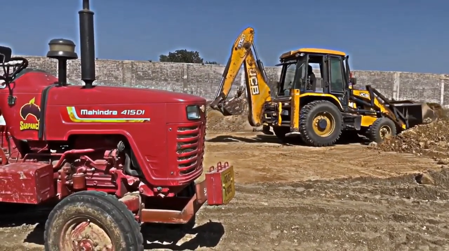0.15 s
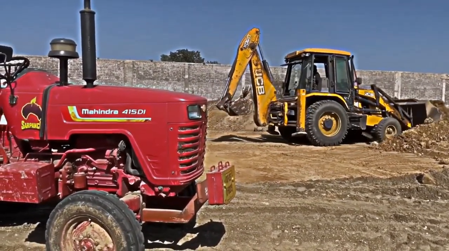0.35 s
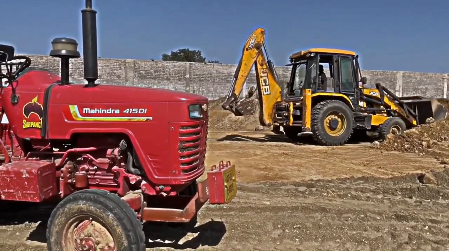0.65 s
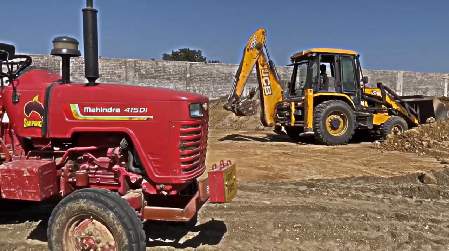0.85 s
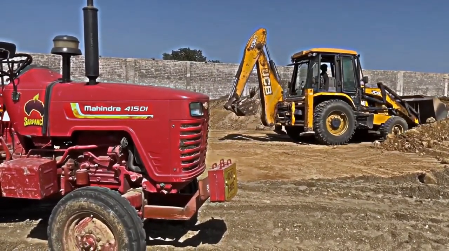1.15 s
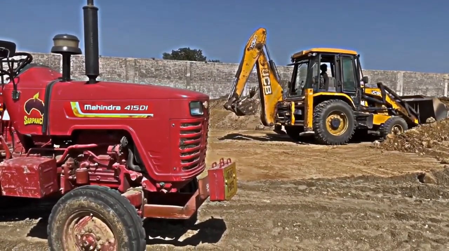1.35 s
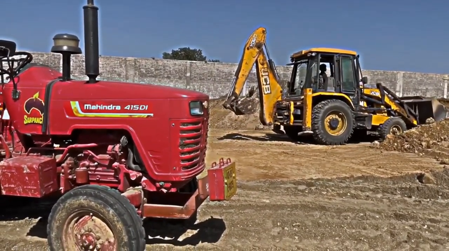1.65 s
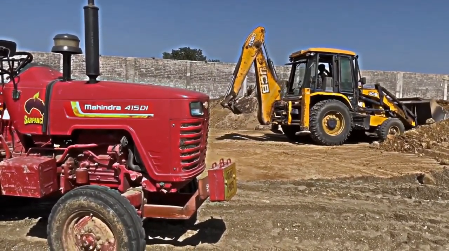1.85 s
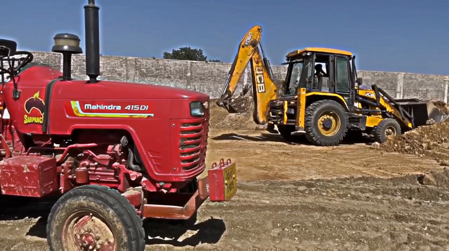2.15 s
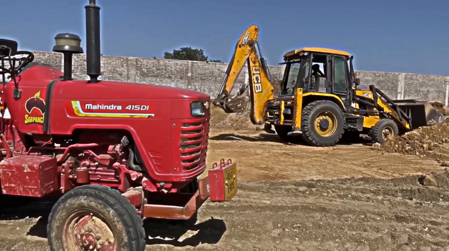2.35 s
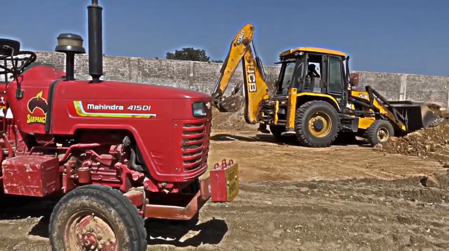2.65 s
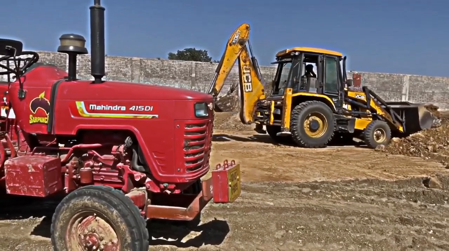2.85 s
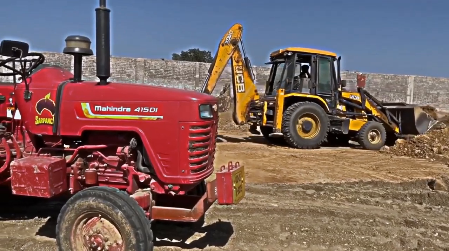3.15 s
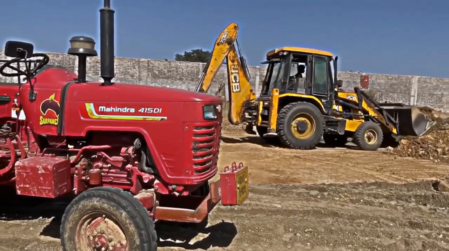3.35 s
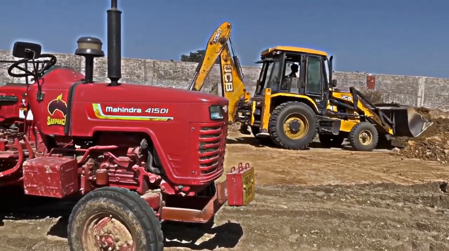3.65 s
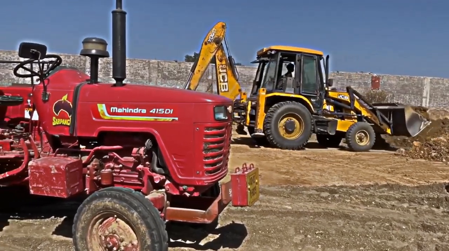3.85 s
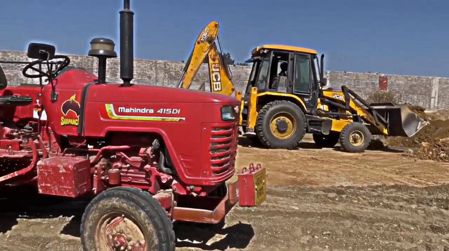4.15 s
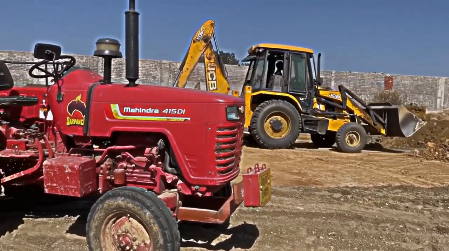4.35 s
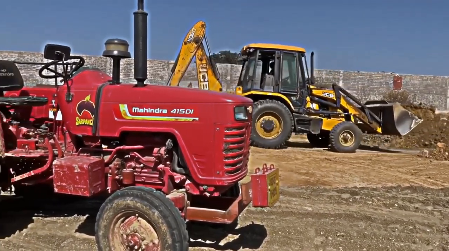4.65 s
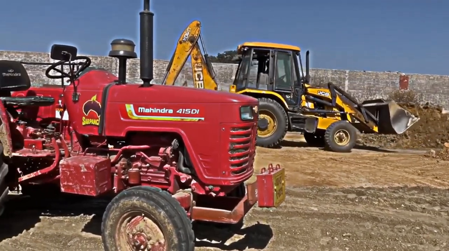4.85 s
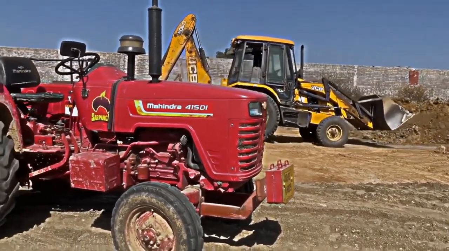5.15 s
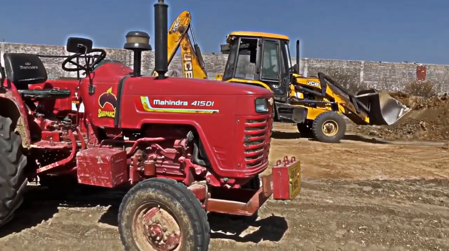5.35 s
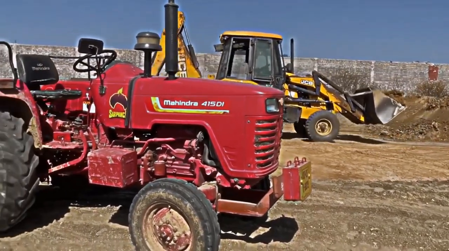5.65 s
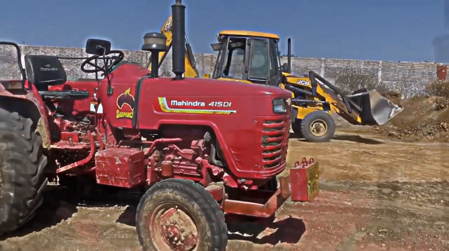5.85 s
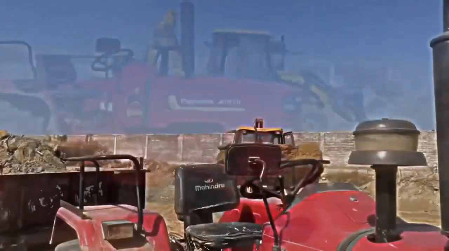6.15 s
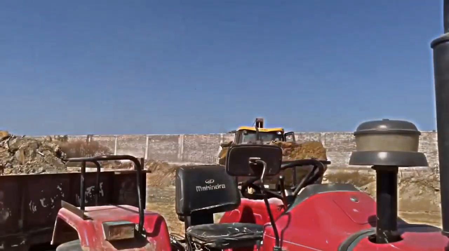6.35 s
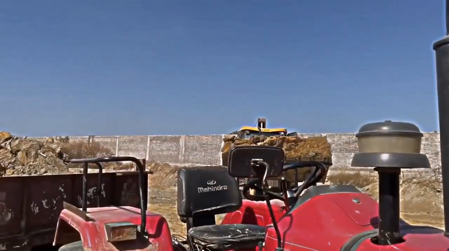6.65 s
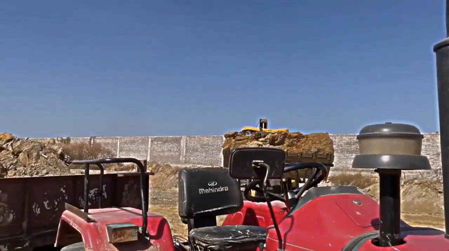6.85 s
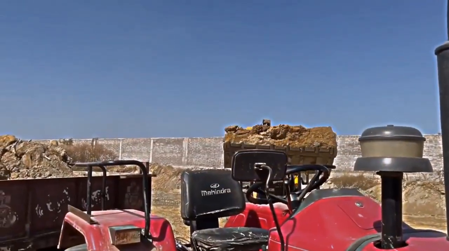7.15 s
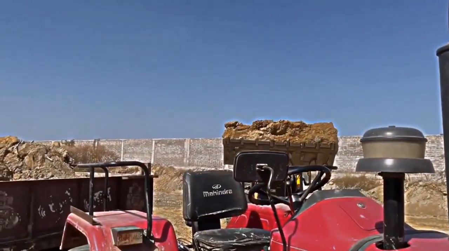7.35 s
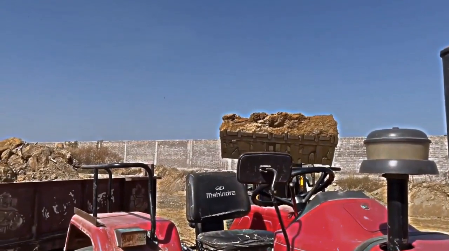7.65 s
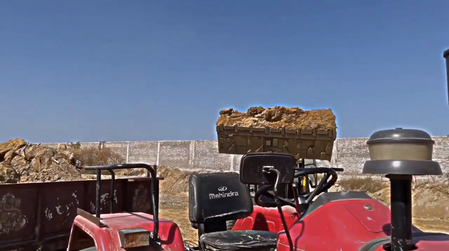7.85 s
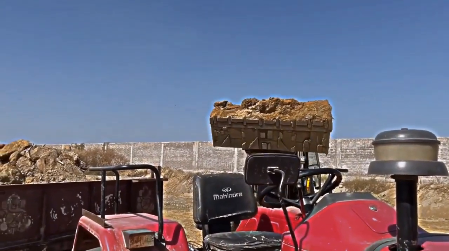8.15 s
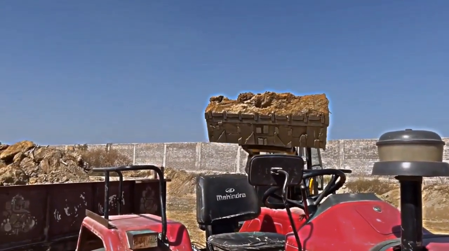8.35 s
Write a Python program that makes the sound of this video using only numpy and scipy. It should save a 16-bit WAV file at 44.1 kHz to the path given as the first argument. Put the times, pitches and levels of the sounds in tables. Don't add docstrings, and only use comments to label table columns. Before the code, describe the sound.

A loader's diesel rumbles across an open earth site with pump whine and bucket thumps, then dissolves to a loud, close engine throbbing at higher revs.

```python
import sys
import numpy as np
from scipy import signal
from scipy.fft import rfft, irfft, next_fast_len
from scipy.io import wavfile
from scipy.ndimage import uniform_filter1d

SR = 44100
rng = np.random.default_rng(int(sys.argv[2]) if len(sys.argv) > 2 else 0)


def unload_wav(signal):
    wavfile.write(
        sys.argv[1],
        SR,
        np.round(np.clip(np.atleast_2d(signal).T, -1, 1) * 32767).astype(np.int16),
    )


def invert_db(level):
    return 10 ** (np.asarray(level, dtype=float) / 20)


N = 375291
SIZE = next_fast_len(N + 8192)
HZ = np.fft.rfftfreq(SIZE, 1 / SR)
T = np.arange(N) / SR
LIGHT_TURNS_PER_S = 21.4


def evened(x):
    return x / np.sqrt(np.mean(x ** 2) + 1e-20)


def read(points, hz):
    f, value = np.transpose(points)
    return np.interp(np.log(hz + 1), np.log(f + 1), value)


def play(rows):
    s, *columns = np.transpose(rows)
    return [uniform_filter1d(np.interp(T, s, c), size=3500) for c in columns]


def step(s, rise_s):
    return np.clip((T - s) / rise_s, 0, 1)


def span_of(s, length):
    return slice(max(round(s * SR), 0), round((s + length) * SR))


def swells(rows):
    out = np.zeros(N)
    for s, length, db in rows:
        span = span_of(s, length)
        out[span] += db * np.sin(np.pi * (T[span] - s) / length) ** 2
    return out


def above(hz):
    return 1 / (1 + (hz / (HZ + 1)) ** 6)


def modes(table):
    return sum(invert_db(db) / (1 + 2j * (HZ - hz) / width) for hz, width, db in table)


def crank_noise(turns, repeat, knock, uneven):
    fresh = rng.standard_normal((int(turns[-1]) + 21, 2048))
    kept = signal.lfilter([1], [1, -np.clip(repeat, 0, .95)], fresh, axis=0)[20:]
    x = kept[turns.astype(int), (turns % 1 * 2048).astype(int)]
    firing = np.cos(4 * np.pi * turns) - .25 * np.sin(8 * np.pi * turns)
    swell = knock * firing + uneven * np.cos(2 * np.pi * turns)
    return rfft(evened(x * np.exp(swell)), SIZE)


def at_ports(turns, same, lead, *grain):
    # (frequency [Hz], left minus right [dB])
    lean = [(60, -1.5), (130, 2), (290, 1), (620, -1.5), (1360, -3), (2950, 1), (6440, 0), (14000, 0)]
    likeness = np.clip(read(same, HZ), 0, 1)
    left = crank_noise(turns, *grain)
    shared = likeness * left * np.exp(-1j * read(lead, HZ))
    right = shared + np.sqrt(1 - likeness ** 2) * crank_noise(turns, *grain)
    return np.array([left, right]) * invert_db(np.outer([.5, -.5], read(lean, HZ)))


def layer(z, gain, level_db, lo_hz, hi_hz):
    z = z * gain
    inside = abs(z.mean(0)[(HZ > lo_hz) & (HZ < hi_hz)]) ** 2
    return irfft(z, SIZE)[:, :N] * invert_db(level_db) / np.sqrt(2 * inside.sum() / SIZE / N)


def shifting_air(x, patchy_db, start_hz):
    hz, t, z = signal.stft(x, SR, nperseg=2048)
    field = rng.standard_normal(z.shape[1:])
    field = evened(uniform_filter1d(uniform_filter1d(field, size=5, axis=0), size=5, axis=1))
    upper = np.clip(hz / start_hz - 1, 0, 1)[:, None]
    return signal.istft(z * invert_db(patchy_db * field * upper), SR, nperseg=2048)[1][:, :N]


def songs(z, table):
    x, out = irfft(z, SIZE), np.zeros((2, SIZE))
    for s, length, hz, width, db in table:
        start = round(s * SR)
        n = round(length * 100) * SR // 100
        span = slice(start, start + n)
        ring = 1 / (1 + .95j * (np.fft.rfftfreq(n, 1 / SR) - hz) / width) ** 2
        sung = evened(irfft(rfft(x[:, span]) * ring, n))
        out[:, span] += invert_db(db - 1.0) * sung * signal.windows.tukey(n, .5)
    return out[:, :N]


def engine(turns, levels_db, colour, hull, singing, same, lead, low, high):
    rumble_db, boom_db, growl_db, clatter_db = levels_db
    body = at_ports(turns, same, lead, *low)
    knock = at_ports(turns, same, lead, *high)
    tone = invert_db(read(colour, HZ)) * (1 + modes(hull))
    a, b, c = above(186.0), above(307), above(1140)
    out = layer(body, tone * np.sqrt(1 - a), rumble_db, 35, 150)
    out += layer(body, tone * np.sqrt(a * (1 - b)), boom_db, 160, 300)
    out += layer(knock, tone * np.sqrt(b * (1 - c)), growl_db, 320, 1200)
    out += layer(knock, tone * np.sqrt(c), clatter_db, 2400, 7000)
    ring_up = evened(np.exp(.3 * np.cos(4 * np.pi * turns)))
    return shifting_air(out, patchy_db=2.16, start_hz=540) + songs(knock, singing) * ring_up


def throb(turns, orders):
    angle = np.linspace(0, 1, 2049)
    shape = 0
    for k, db in orders:
        phase = -.2 + .0875 * k ** 2 + np.pi * (6 < k < 16)
        shape = shape + invert_db(db) * np.cos(2 * np.pi * k * angle + phase)
    return np.interp(turns % 1, angle, evened(shape))


def strands(turns):
    # (time [s], length [s], frequency [Hz], level [dB])
    brief = [(-0.06, 0.28, 67.0, -21.5), (-0.05, 0.4, 85.0, -20.5), (-0.03, 0.13, 108.0, -25),
             (0.17, 0.31, 107.0, -21), (0.27, 0.21, 214.0, -26.5), (0.33, 0.2, 85.0, -27),
             (0.44, 0.39, 66.0, -20), (0.6, 0.16, 85.0, -19.5), (0.84, 0.43, 84.0, -30.5),
             (0.9, 0.57, 149.0, -32.5), (1.03, 0.34, 170.0, -33), (1.182, 0.18, 216.0, -38.0),
             (1.19, 0.12, 258.0, -40), (1.21, 0.28, 108.0, -36), (1.42, 0.19, 63.0, -28.5),
             (1.5, 0.2, 152.0, -38), (1.547, 0.2, 173.0, -35.0), (1.59, 0.24, 64.0, -30),
             (1.64, 0.24, 86.0, -36), (1.85, 0.37, 64.0, -28), (1.87, 0.23, 174.0, -31),
             (1.883, 0.21, 150.0, -40), (1.88, 0.2, 217.0, -30), (1.91, 0.19, 106.0, -29),
             (1.98, 0.27, 85.0, -27), (2.12, 0.49, 63.0, -26), (2.183, 0.42, 151.0, -35),
             (2.29, 0.3, 172.0, -36), (2.46, 0.21, 108.0, -31), (2.52, 0.47, 85.0, -30),
             (2.64, 0.21, 107.0, -26), (2.66, 0.16, 150.0, -33), (2.98, 0.38, 62.0, -31),
             (3.103, 0.47, 128.0, -29.5), (3.29, 0.25, 172.0, -32), (3.437, 0.33, 106.0, -28),
             (3.82, 0.68, 85.0, -23.0), (3.96, 0.2, 151.0, -27), (4.21, 0.42, 173.0, -31),
             (4.583, 0.25, 85.0, -23.5), (4.72, 0.46, 109.0, -23.5), (4.773, 0.31, 87.0, -21.0),
             (4.908, 0.35, 129.0, -19.5), (4.982, 0.38, 87.0, -18.5), (4.978, 0.52, 108.0, -19.5),
             (5.35, 0.38, 84.0, -13), (5.468, 0.21, 172.0, -24.0), (5.92, 0.16, 65.0, -17),
             (5.92, 0.16, 110.0, -14), (6.063, 0.1, 82.0, -20)]
    # (time [s], length [s], frequency [Hz], level [dB])
    low_orders = [(0, .36, 43, -27), (.55, .22, 43, -28), (2.3, .7, 43, -33), (3.05, .28, 43, -30),
                  (3.4, .5, 43, -29), (4.0, .22, 43, -29), (4.3, .6, 43, -31), (5.15, .3, 43, -22),
                  (5.48, .22, 43, -24), (3.7, .45, 64, -28), (4.15, .22, 64, -29), (5.05, .9, 64, -23),
                  (3.25, .6, 86, -30), (5.42, .5, 107, -21), (.55, .22, 107, -25), (3.5, .7, 129, -30),
                  (4.55, .5, 129, -23), (5.2, .22, 129, -21), (5.46, .32, 129, -23), (.1, .45, 129, -28)]
    rows = brief + low_orders
    out = np.zeros(N)
    for (s, length, hz, db), path in zip(rows, rng.random(len(rows))):
        span = span_of(s, length)
        order = round(hz / LIGHT_TURNS_PER_S)
        tone = np.cos(2 * np.pi * (order * turns[span] + path))
        swell = np.sin(np.pi * (T[span] - s) / length) ** 2
        out[span] += np.sqrt(2) * invert_db(db - 1) * swell * tone
    return out


def far_loader():
    # (time [s], level [dB])
    far_load = [(0, -18), (.3, -18.5), (.47, -22.5), (.66, -17), (.9, -30), (1.2, -31.5), (1.5, -29),
                (1.87, -33.5), (1.99, -26.5), (3.1, -28.5), (3.88, -26), (4.05, -21), (4.58, -28),
                (4.72, -22), (5.2, -16), (5.58, -14), (5.84, -17.5), (6.2, -17)]
    # (time [s], length [s], gain [dB])
    heaves = [(-.2, 0.33, 11), (.25, 0.51, 3.5), (.55, 0.48, 4), (1.1, 0.36, 0.5), (1.88, 0.46, 4),
              (2.2, 0.31, 6.5), (2.62, 0.26, 4), (3.3, 0.16, 1.5), (3.92, 0.18, 5.5), (4.7, 0.56, -2.5),
              (5.4, 0.31, 2.5)]
    # (time [s], length [s], gain [dB])
    scrapes = [
        (.3, 0.39, 2.5),
        (.65, 0.27, 3),
        (1.88, 0.14, 2.5),
        (2.08, 0.31, 6),
        (2.53, 0.21, 5),
        (4.55, 0.59, 0.5),
        (5.05, 1, 0.5),
        (5.45, .35, 1),
    ]
    # (frequency [Hz], level [dB per Hz])
    far_colour = [(28, -16), (45, 2.5), (93, 0.5), (215, -16), (436, -21.5), (955, -26), (1610, -35.5),
                  (2210, -36.5), (3300, -40.5), (4500, -41.5), (5600, -48), (8500, -49.5), (12000, -55.5),
                  (15500, -56)]
    # (frequency [Hz], width [Hz], level over the rest [dB])
    far_body = [(532, 37, -4.5), (940, 16, -7), (2140, 770, -12), (4350, 150, -7.5), (4920, 62, -6)]
    # (time [s], length [s], frequency [Hz], width [Hz], level [dB])
    far_songs = [(3.9, 1.7, 2170, 40, -55), (1.1, .6, 3625, 40, -62), (.45, 1.1, 4450, 35, -61),
                 (.3, 2.1, 1290, 50, -47), (1.8, .35, 1845, 30, -53), (.3, .5, 870, 30, -46),
                 (1.8, .7, 845, 40, -44), (.68, .27, 525, 25, -43), (1.8, 4.0, 530, 26, -39),
                 (2.9, .4, 650, 30, -42), (3.8, .5, 965, 25, -43), (4.7, .36, 352, 25, -34),
                 (3.4, .8, 370, 25, -40), (5.7, .55, 548, 20, -34), (0, .15, 570, 40, -38),
                 (.7, .3, 960, 30, -46), (1.8, .6, 960, 30, -44), (5.25, .45, 345, 30, -36),
                 (5.3, .6, 940, 50, -44), (1.61, .11, 2280, 200, -47), (1.1, .4, 530, 25, -44),
                 (4.85, 1.1, 2180, 120, -47),
        (4.9, .45, 1900, 90, -49),
        (5.0, .7, 4300, 150, -54),
        (5.3, .6, 2950, 80, -53),
        (5.1, .6, 5100, 120, -58),
        (5.0, .7, 3650, 100, -56),
        (0, .14, 280, 40, -30),
        (.52, .14, 535, 30, -39),
    ]
    # (frequency [Hz], left-right likeness [0-1])
    far_same = [(60, 1), (350, 1), (860, 1), (1400, 1), (1900, 0.81), (2900, 0.58), (4200, 0.97),
                (5500, 0.083), (7000, 0.7), (14000, .4)]
    # (frequency [Hz], left lead [rad])
    far_lead = [(0, 0), (1290, -0.7), (1550, -1.5), (1980, -0.2), (2670, -0.8), (5000, 0.3), (6030, -2.7),
                (6550, -1.4), (7670, -3.1), (9560, -3.3), (10600, -6.0), (11000, -6.2), (13000, -6.3),
                (14200, -9.4)]
    # (multiple of the crank turn, level [dB])
    far_exhaust = [(1, -27), (2, 0), (3, 0.5), (4, -1), (5, -12), (6, 2), (7, -27), (8, -12.5)]

    light_db = -28
    load = play(far_load)[0] - light_db
    heave = swells(heaves)
    turns = np.cumsum(LIGHT_TURNS_PER_S + .02 * load) / SR
    nearing = step(0, 4.4)
    pull = 2 * step(1.87, 0.055)
    hidden = -2 * step(5.7, 0.093)
    growl = -40 + 4.5 * nearing + pull + hidden + 0.31 * heave
    clatter = -50.5 + 5.5 * nearing + hidden + swells(scrapes)
    levels_db = light_db + load - 4.5, -36 + 0.2 * load + heave, growl, clatter
    low, high = (.68, .08, .08), (.42, 0.036 + 0.14 * nearing, .07)
    high = (.42, 0.036 + 0.14 * nearing, .07)
    rough = engine(turns, levels_db, far_colour, far_body, far_songs, far_same, far_lead,
                   low, high)
    note_db = -49.5 + 0.84 * load + 2 * T
    return rough + strands(turns) + invert_db(note_db) * throb(turns, far_exhaust)


def pump():
    # (time [s], length [s], frequency [Hz], level [dB])
    whines = [(.27, 1.3, 2163, -48), (.26, .2, 2155, -47), (.43, .17, 2160, -45), (.72, .3, 2170, -43),
              (1.0, .18, 2165, -45), (1.16, .16, 2150, -43), (1.29, .13, 2170, -42), (1.39, .2, 2160, -46),
              (1.62, .46, 2165, -46), (2.24, .2, 2160, -45), (2.56, .2, 2165, -47), (2.75, .9, 2160, -57),
              (6.1, .1, 2165, -46), (6.21, .1, 2150, -41), (6.29, .22, 2155, -39), (6.49, .16, 2140, -46),
              (.45, .5, 3620, -53), (1.82, .26, 3320, -55), (2.1, .14, 3340, -50), (2.28, .14, 3330, -49),
              (2.1, .36, 1850, -46), (2.56, .2, 1850, -49), (6.08, .24, 3290, -53), (.42, .16, 1295, -43),
              (.7, .7, 1295, -50), (.31, .16, 870, -43)]
    wander = rng.standard_normal((2, N))
    wander = evened(uniform_filter1d(uniform_filter1d(wander, size=700), size=700))
    drift = 2 * np.pi * np.cumsum(10.27 * wander[0]) / SR
    throbbing = np.exp(.31 * np.cos(4 * np.pi * LIGHT_TURNS_PER_S * T) + .28 * wander[1])
    tones = np.zeros(N)
    for s, length, hz, db in whines:
        span = span_of(s, length)
        t = T[span]
        fade = np.clip(np.minimum(t - s, s + length - t) / 0.041, 0, 1)
        tones[span] += invert_db(db - 1) * fade * np.sin(2 * np.pi * hz * t + drift[span])
    return np.sqrt(2) * tones * evened(throbbing)


def knocks():
    # (time [s], peak level [dB], frequency [Hz])
    hood_rings = [(0.737, -36, 510), (1.076, -23, 826), (2.354, -21, 726), (2.475, -22, 550),
                  (2.561, -22, 554), (2.751, -23, 530), (2.8, -22, 536), (2.871, -21, 490),
                  (3.184, -25, 536), (3.231, -25, 525), (3.466, -19, 522), (3.513, -30, 545),
                  (3.609, -18, 500), (4.171, -23, 538), (4.217, -20, 533), (4.268, -21, 517),
                  (4.315, -16, 536), (4.591, -21, 716), (5.103, -23, 514), (5.148, -24, 576),
                  (5.195, -23, 520), (5.242, -22, 864), (5.312, -22, 544), (5.333, -23, 530),
                  (5.381, -16, 560), (5.43, -18, 580), (5.478, -16, 520), (5.524, -13, 520),
                  (5.712, -16, 517), (5.753, -21, 930)]
    # (time [s], peak level [dB], frequency [Hz], t60 [s])
    thumps = [
        (1.194, -18, 196, 0.035),
        (1.237, -14.5, 254, 0.03),
        (1.939, -14, 210, 0.038),
        (1.968, -8, 157, 0.018),
        (2.127, -20, 156, 0.024),
        (.865, -19, 250, .04),
        (.915, -18.5, 262, 0.05),
        (6.826, -17, 205, .05),
    ]
    # (time [s], peak level [dB], frequency [Hz])
    pipe_rings = [(6.752, -20, 340), (6.774, -23, 362), (6.833, -27, 342), (6.851, -24, 388),
                  (6.897, -14, 550), (6.917, -22, 390), (6.963, -15, 404), (7.035, -17, 547),
                  (7.102, -19, 550), (7.147, -25, 393), (7.263, -20, 396), (7.311, -14, 490),
                  (7.331, -19, 398), (7.359, -19, 570), (7.393, -16, 390), (7.423, -14.5, 385),
                  (7.498, -15, 542), (7.541, -19, 563), (7.588, -12, 540), (7.652, -9.5, 554),
                  (7.679, -18, 366), (7.72, -20, 347), (7.754, -20, 412), (7.791, -14, 547),
                  (7.883, -14, 492), (7.94, -12, 383), (7.977, -19, 560), (8.045, -19, 390),
                  (8.118, -17, 406), (8.157, -16, 396), (8.182, -8, 432), (8.228, -7.5, 414),
                  (8.249, -7.5, 506), (8.275, -11, 400), (8.317, -14, 382), (8.341, -12.5, 482),
                  (8.386, -16, 395), (8.411, -15, 342), (8.434, -22, 402), (8.489, -20, 389)]
    # (time [s], peak level [dB], frequency [Hz])
    bracket_rings = [(6.8, -27, 915), (6.827, -21.5, 963), (6.938, -26, 960), (6.984, -25, 1050),
                     (7.033, -18.5, 1000), (7.337, -31, 950), (7.418, -25, 953), (7.678, -22, 966),
                     (7.866, -29, 958), (7.957, -25, 970), (7.998, -32, 900), (8.047, -26, 977),
                     (8.072, -20.5, 970), (8.135, -21, 960), (8.181, -18.5, 975), (8.232, -25, 955),
                     (8.273, -23.5, 945), (8.333, -28, 900), (8.366, -21, 990), (8.411, -18, 990)]
    # (time [s], peak level [dB], frequency [Hz], t60 [s])
    ticks = [
        (7.8497, -17.5, 3600, 0.005),
        (7.8498, -20, 4130, 0.0038),
        (7.85, -24, 4750, .004),
        (7.8962, -17, 3650, 0.0059),
        (7.8963, -21, 4200, 0.0036),
        (7.8965, -24, 4750, .004),
    ]
    blows = ticks + thumps
    for rows, t60 in [(pipe_rings, 0.066), (bracket_rings, 0.15), (hood_rings, 0.064)]:
        blows = blows + [(s, db - 4, hz, t60) for s, db, hz in rows]
    out, t = np.zeros(N + 4000), np.arange(4000) / SR
    rise = np.minimum(t / .0006, 1)
    for s, db, hz, t60 in blows:
        out[round(s * SR):][:4000] += invert_db(db - 60 * t / t60) * rise * np.sin(2 * np.pi * hz * t)
    return out[:N]


def near_engine():
    # (time [s], speed [firings/s])
    near_speed = [(6.05, 39.31), (6.24, 39.34), (6.4, 40.04), (6.52, 41.51), (6.74, 41.21), (6.97, 42.98),
                  (7.22, 43.44), (7.85, 43.69), (8.25, 43.71), (8.51, 42.71)]
    # (time [s], level [dB])
    near_level = [(6.05, -17.5), (6.36, -14), (6.52, -8), (6.72, -8.5), (6.95, -6.5), (8.51, -8)]
    # (time [s], length [s], gain [dB])
    rattles = [
        (6.2, 0.61, 2),
        (6.95, 0.23, -1),
        (7.75, 0.52, 2.5),
        (8.15, 0.48, 3),
    ]
    # (frequency [Hz], level [dB per Hz])
    near_colour = [(28, -26), (60, 8.5), (120, -1.5), (200, -19), (300, -28), (460, -14), (680, -20),
                   (970, -20.5), (1600, -29), (2300, -28.5), (5000, -41.5), (8200, -50), (11000, -49.5),
                   (15500, -59)]
    # (frequency [Hz], width [Hz], level over the rest [dB])
    near_body = [(366, 21, 1), (556, 27, 1.5), (960, 26, -0.5), (1860, 63, -8), (2500, 180, -18)]
    # (time [s], length [s], frequency [Hz], width [Hz], level [dB])
    near_songs = [(6.0, .55, 555, 20, -35), (6.1, .55, 955, 28, -41), (6.4, .45, 362, 40, -41),
                  (6.25, .3, 2150, 90, -45), (7.0, .45, 980, 40, -41), (6.4, 1.9, 790, 50, -43),
                  (7.2, 1.1, 552, 45, -32), (7.15, 1.2, 490, 70, -34.5), (7.05, 1.45, 395, 40, -38),
                  (7.9, .6, 400, 50, -36), (7.9, .6, 975, 50, -42), (8.0, .4, 1130, 40, -43),
                  (8.1, .4, 1520, 80, -46), (6.3, .22, 2310, 60, -49)]
    # (frequency [Hz], left-right likeness [0-1])
    near_same = [(60, 0.98), (350, 0.93), (860, 0.92), (1400, 0.14), (1900, 0.52), (3400, 0.96),
                 (4700, 0.12), (7000, 0.28), (14000, .3)]
    # (frequency [Hz], left lead [rad])
    near_lead = [(0, 0), (1120, -0.2), (1380, -1.5), (1810, -0.2), (3450, 1.5), (5940, -0.6), (7060, -1.6),
                 (7670, -3.1), (8960, -3.2), (11000, -6.3), (13400, -6.3), (13700, -6.7), (14000, -9.6),
                 (14200, -9.2)]
    # (multiple of the crank turn, level [dB])
    exhaust_orders = [(1, -18.5), (2, -1.5), (3, -27), (4, 3), (5, -14), (6, -4), (7, -37.5), (8, -20.5),
                      (9, -36), (10, -23.5), (11, -34.5), (12, -29), (13, -46.5), (14, -41), (15, -37)]
    # (multiple of the crank turn, level [dB])
    pipe_orders = [(16, -11), (17, -13.5), (18, 2), (19, -12), (20, -10), (21, -19.5), (22, -5.5),
                   (23, -12.5), (24, -3.5), (25, -3.5), (26, -7.5)]
    # (time [s], level re exhaust [dB])
    pipe_fill = [(6.05, -24.5), (6.75, -28), (7.1, -25), (7.45, -22.5), (7.95, -26), (8.25, -21.5),
                 (8.51, -25)]

    firings, exhaust = play(near_speed)[0], play(near_level)[0]
    rattle = swells(rattles)
    turns = np.cumsum(firings / 2) / SR + .92
    levels_db = exhaust - 23, exhaust - 27, -33.5 + 0.54 * rattle, -46.5 + rattle
    rough = engine(turns, levels_db, near_colour, near_body, near_songs, near_same, near_lead,
                   (.7, .3, .2), (.55, .25, .12))
    note = throb(turns, exhaust_orders) + invert_db(play(pipe_fill)[0]) * throb(turns, pipe_orders)
    return invert_db(exhaust) * note * invert_db([[.3], [-.3]]) + rough


def scene():
    start_s, end_s = 5.59, 6.47
    near = step(start_s, end_s - start_s) * np.pi / 2
    return np.cos(near) * far_loader() + np.sin(near) * near_engine() + knocks() + pump()


def without(x, gaps):
    hz, t, z = signal.stft(x, SR, nperseg=2048)
    for edges in gaps:
        wander = evened(uniform_filter1d(rng.standard_normal((2, 1, len(t))), size=5))
        lo, hi = np.reshape(edges, (2, 1, 1)) + 130 * wander
        z = z * ((hz[:, None] < lo) | (hz[:, None] > hi))
    return signal.istft(z, SR, nperseg=2048)[1][:N]


def band_limit(x):
    return signal.sosfilt(signal.butter(12, 15480, fs=SR, output="sos"), x)


def record(dry):
    # (low edge [Hz], high edge [Hz])
    sum_gaps = [(7650, 9140), (14550, 22000)]
    # (low edge [Hz], high edge [Hz])
    difference_gaps = [(10950, 13100), (15450, 26000)]
    x = signal.sosfiltfilt(signal.butter(3, 33, "high", fs=SR, output="sos"), dry)
    straight = np.clip(x, -.8, .8)
    x = straight + .24 * np.tanh((x - straight) / .24)
    both = without((x[0] + x[1]) / 2, sum_gaps)
    apart = without((x[0] - x[1]) / 2, difference_gaps)
    return band_limit(np.array([both + apart, both - apart]))


dry = scene()
out = record(dry)
unload_wav(out)
```